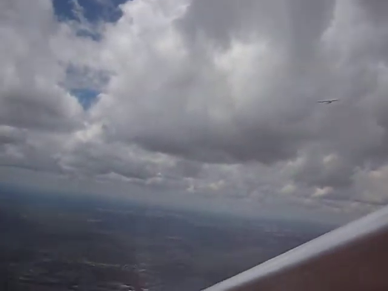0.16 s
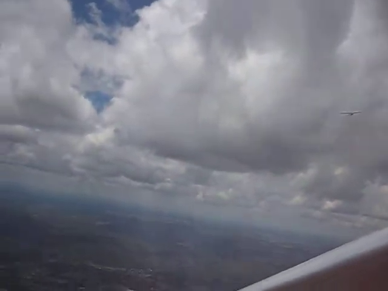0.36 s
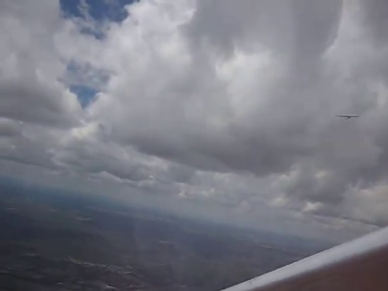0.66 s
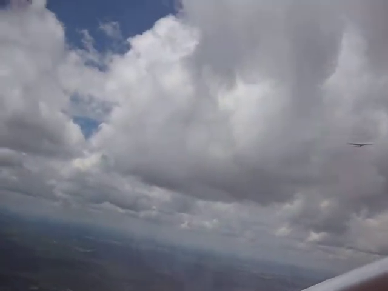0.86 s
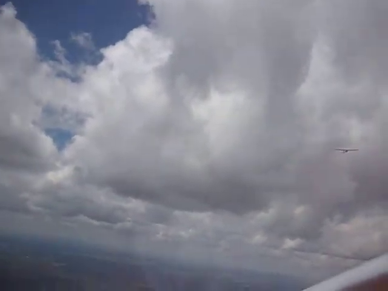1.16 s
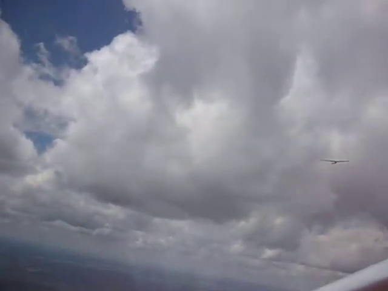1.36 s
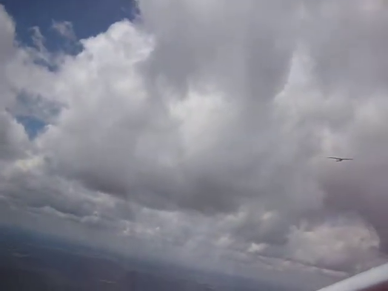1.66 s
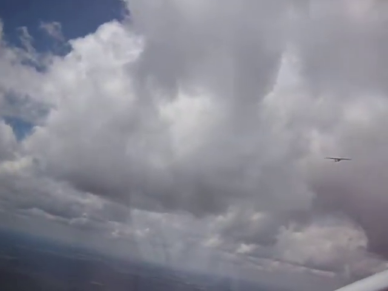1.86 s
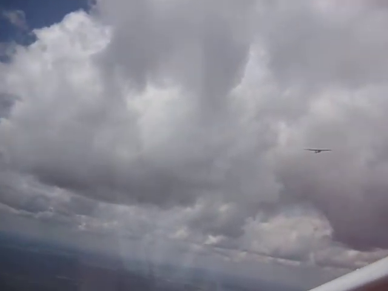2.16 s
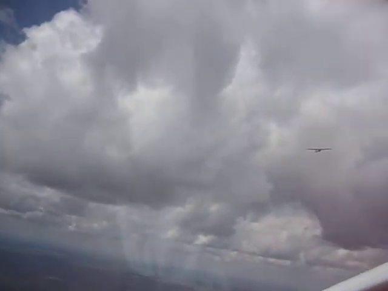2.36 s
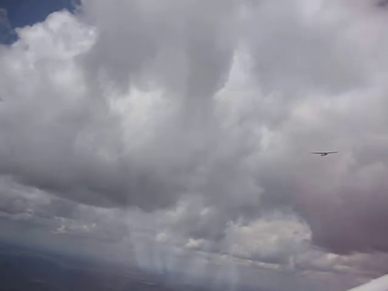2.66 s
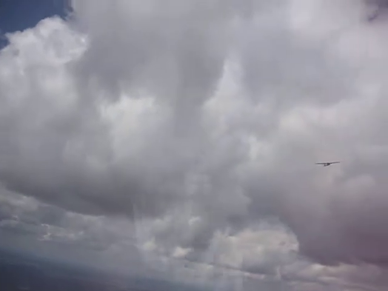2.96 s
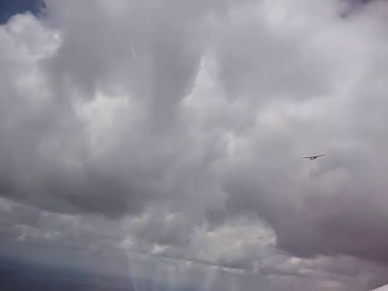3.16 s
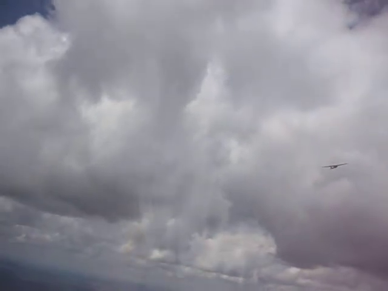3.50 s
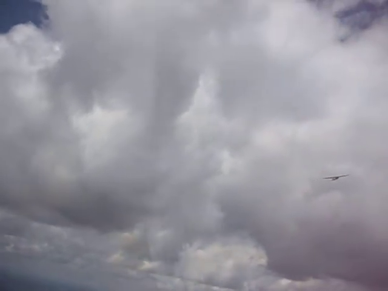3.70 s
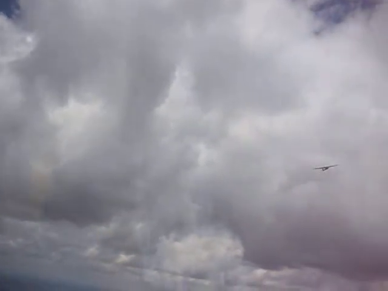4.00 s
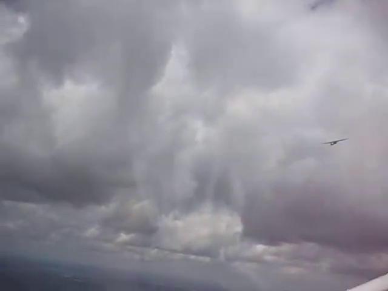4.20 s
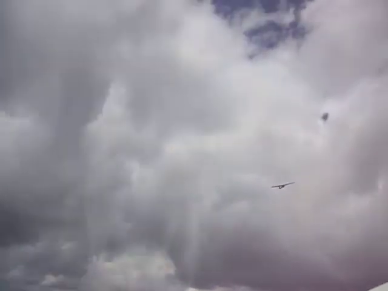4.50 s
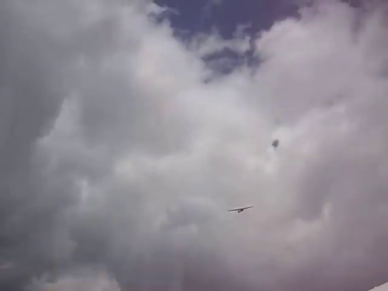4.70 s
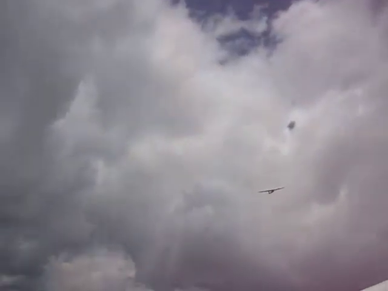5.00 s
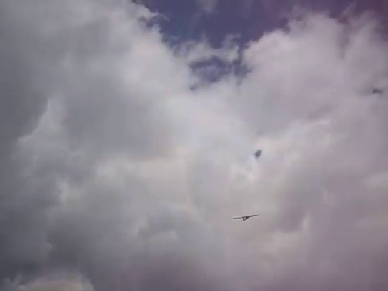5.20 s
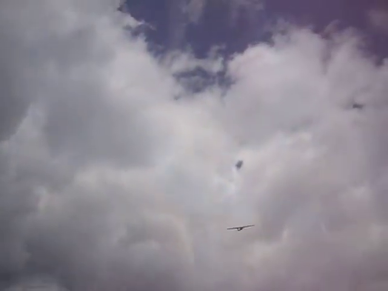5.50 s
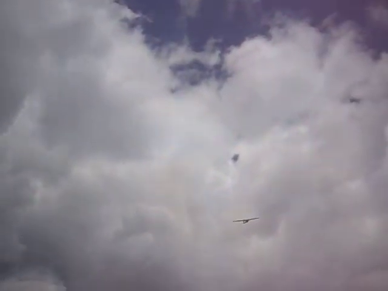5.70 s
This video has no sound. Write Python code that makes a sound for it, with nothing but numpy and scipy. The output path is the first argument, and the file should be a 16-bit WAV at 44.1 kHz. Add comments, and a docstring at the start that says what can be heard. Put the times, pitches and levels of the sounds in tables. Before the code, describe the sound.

Steady, low-heavy rush of air past a glider canopy, heard inside the cockpit, with faint seal hiss and one tiny tick midway.

```python
"""A broad rush of air past the canopy of a glider, heard inside the cockpit through a small camera.
Shaped noise in three bands makes hull buffeting, shell drone and canopy roar; two more hiss through the seals.
One airflow curve swells and eases them all, with a brief dip near the end; slow random wobbles add flutter.
One thin tick, a sudden step with a very fast decay, sounds about midway."""
import sys
import numpy as np
from scipy import signal
from scipy.fft import rfft, irfft
from scipy.io import wavfile
from scipy.ndimage import uniform_filter1d

SR = 44100
rng = np.random.default_rng(int(sys.argv[2]) if len(sys.argv) > 2 else 0)


def digitize_waveform(pressure):
    """Quantize a signal to 16-bit integers and store it at the path in sys.argv[1].

    Rows of a 2-D input are taken as channels; values are limited to [-1, 1].
    """
    field = np.atleast_2d(pressure).T
    bounded = np.clip(field, -1, 1)
    quanta = np.round(bounded * 32767).astype(np.int16)
    wavfile.write(sys.argv[1], SR, quanta)


N = 257984
HZ = np.fft.rfftfreq(N, 1 / SR)
TIME = np.arange(N) / SR  # seconds

# upper edges of the noise bands; the fizz lies above the last one
BUFFET_TOP_HZ, DRONE_TOP_HZ, ROAR_TOP_HZ, FIZZ_FROM_HZ = 196, 423, 897, 2620


def gain_of(db):
    """Decibels to amplitude."""
    return 10 ** (np.asarray(db) / 20)


def evened(x):
    """Scales to an rms of one."""
    return x / np.sqrt(np.mean(x ** 2) + 1e-20)


def read(points):
    """Joins a table of (Hz, dB) by straight lines on a log-frequency axis."""
    hz, db = np.transpose(points)
    return np.interp(np.log(HZ + 1), np.log(hz + 1), db)


def below(hz, order=16):
    """Share of the power that a low-pass lets through; a higher order is steeper."""
    return 1 / (1 + (HZ / hz) ** order)


def cockpit(lowest_hz=13):
    """Relative amplitude spectrum of the air, shaped by the resonances of the small closed cabin."""
    # Turbulent air as it reaches the cockpit. Each row: frequency in Hz, relative level per Hz in dB.
    air_spectrum = [(16, -4.5), (30, 0.5), (100, -3), (155, -1), (190, -13.5), (400, -15.5), (700, -18.5),
                    (1000, -25.5), (1400, -26.5), (2300, -30.5), (3400, -30.5), (4400, -35), (5000, -37),
                    (5300, -39.5)]
    # Cabin resonances (+) and standing-wave nulls (-) at the microphone.
    # Each row: centre in Hz, width at half the dB height in Hz, height in dB.
    cabin_modes = [(48, 9.3, -6.5), (65, 18, 3), (149, 22, -1), (257.5, 66, 6), (319, 5.8, 5),
                   (410, 28, -3), (452, 67, 5.4), (550.2, 22, 7), (606, 14, -3.0), (683, 32, 0.5),
                   (756, 16, -8), (850, 54, 1.4), (1102, 43, 3), (1229, 70, 4), (1332, 67, 4.5),
                   (1490, 23, -2), (1520, 43, 2.5), (1590, 29, -4), (1770, 68, 2.5), (1885, 88, 2.5),
                   (2170, 120, 2), (2480, 46, 1.2), (2700, 107, 2.1), (3030, 110, 2)]
    modes_db = 0
    for centre_hz, width_hz, height_db in cabin_modes:
        bell = np.exp(-np.log(16) * ((HZ - centre_hz) / width_hz) ** 2)
        modes_db = modes_db + height_db * bell
    low_cut = np.sqrt(1 - below(lowest_hz, order=6))
    return gain_of(read(air_spectrum) + modes_db) * low_cut


def coloured_noise(colour):
    """Random pressure with the given amplitude spectrum and an rms of one."""
    white = rng.standard_normal(N)
    return evened(irfft(rfft(white) * colour, N))


def eddies(fastest_hz):
    """Slow random wobble of unit rms: eddies drifting past."""
    return coloured_noise(np.sqrt(below(fastest_hz, order=4)))


def turbulence(colour, level_db, flutter_db, flutter_hz):
    """Random pressure of one colour; its strength follows the flow and flutters with the eddies."""
    pressure = coloured_noise(colour)
    # level out the noise's own slow swells, so that only the flow and the flutter set the strength
    slow_power = uniform_filter1d(pressure ** 2, size=SR // 5)
    slow_power = uniform_filter1d(slow_power, size=SR // 8)
    steady = pressure / np.sqrt(slow_power)
    return steady * gain_of(level_db + flutter_db * eddies(flutter_hz))


def rush(follow):
    """Swell of a layer in dB: it takes its own share of each change in the airflow."""
    # Strength of the airflow over the canopy, which drives every air layer.
    # Each row: time in seconds, level in dB about the usual strength, before the layer's share.
    airflow = [(0, -0.1), (0.47, 0.6), (0.8, -1.2), (1.15, 0.5), (1.5, -1.24), (2.02, 2.1), (2.25, -0.6),
               (2.47, 1.3), (3.1, 1.44), (3.65, 0.3), (4.0, 1.2), (4.5, 0.5), (4.8, -3), (5.15, -0.6),
               (5.45, -0.8), (5.7, 0.5), (5.85, 0.2)]
    seconds, db = np.transpose(airflow)
    return follow * np.interp(TIME, seconds, db)


def bumps():
    """Changes of buffeting and drone in dB: each patch of rough air comes and goes smoothly."""
    # Patches of rough air. Each row: time of the height in seconds, whole length in seconds,
    # change of hull buffeting in dB, change of shell drone in dB.
    rough_patches = [(1.1, 0.49, -0.5, 3.5), (3.906, 1.1, 1.5, -0.4)]
    shaking, drumming = np.zeros(N), np.zeros(N)
    for height_s, length_s, buffet_db, drone_db in rough_patches:
        phase = np.clip((TIME - height_s) / length_s, -0.5, 0.5)
        swell = np.cos(np.pi * phase) ** 2
        shaking += buffet_db * swell
        drumming += drone_db * swell
    return shaking, drumming


def tick(start_s=2.4853, level_db=-15.5, decay_s=8e-5):
    """One thin, dry tick: a sudden step that dies away exponentially, with no resonance of its own."""
    since = TIME - start_s
    return gain_of(level_db) * (since >= 0) * np.exp(-abs(since) / decay_s)


def seals(colour, hiss_db=-34.0, fizz_db=-36.5):
    """Thin jets of air hiss through the gaps round the canopy; a stronger flow makes them brighter."""
    low, high = below(ROAR_TOP_HZ), below(FIZZ_FROM_HZ)
    hiss_colour = colour * np.sqrt(abs(high - low))
    fizz_colour = colour * np.sqrt(1 - high)
    hiss = turbulence(hiss_colour, hiss_db + rush(follow=1.0), flutter_db=0.37, flutter_hz=18)
    # the upper band follows the flow more strongly, hence the brightening
    fizz = turbulence(fizz_colour, fizz_db + rush(follow=1.25), flutter_db=0.54, flutter_hz=17)
    return hiss + fizz


def airframe(colour, buffet_db=-21.5, drone_db=-29.0, roar_db=-30.0, drone_fade_db_per_s=0.35):
    """Large eddies shake the hull, middling ones drum on the shell, small ones roar over the canopy."""
    low, middle, high = below(BUFFET_TOP_HZ), below(DRONE_TOP_HZ), below(ROAR_TOP_HZ)
    shaking, drumming = bumps()
    buffet_level = buffet_db + rush(follow=0.4) + shaking
    # the shell drone sinks slowly all the while
    drone_level = drone_db + rush(follow=0.5) + drumming - drone_fade_db_per_s * TIME
    roar_level = roar_db + rush(follow=0.6)
    hull_colour = colour * np.sqrt(low)
    shell_colour = colour * np.sqrt(abs(middle - low))
    canopy_colour = colour * np.sqrt(abs(high - middle))
    hull = turbulence(hull_colour, buffet_level, flutter_db=0.34, flutter_hz=6)
    shell = turbulence(shell_colour, drone_level, flutter_db=1.43, flutter_hz=2.2)
    canopy = turbulence(canopy_colour, roar_level, flutter_db=0.74, flutter_hz=6.4)
    return hull + shell + canopy


def scene():
    """All the air noise, coloured by the same cabin, as one channel."""
    colour = cockpit()
    air = airframe(colour) + seals(colour)
    return air[None]


def record(dry, edge_hz=16000):
    """The camera dulls the treble of the air but not of the tick; soft ends, then the band limit."""
    # Treble roll-off of the camera. Each row: frequency in Hz, gain in dB.
    camera_treble = [(5300, 0), (5500, -3.5), (5700, -9), (5900, -16.5), (6100, -27), (6300, -38),
                     (6600, -65)]
    dulled = irfft(rfft(dry, axis=1) * gain_of(read(camera_treble)), N, axis=1)
    heard = dulled + tick()
    heard = heard * signal.windows.tukey(N, 12 / N)  # fades over 6 samples at each end
    band_limit = signal.firwin(511, edge_hz, window=("kaiser", 9), fs=SR)
    return signal.oaconvolve(heard, band_limit[None], "same")


dry = scene()
out = record(dry)
digitize_waveform(out)
```